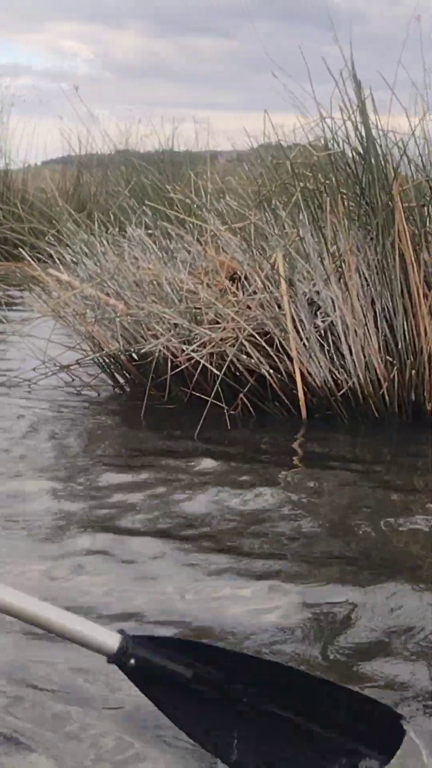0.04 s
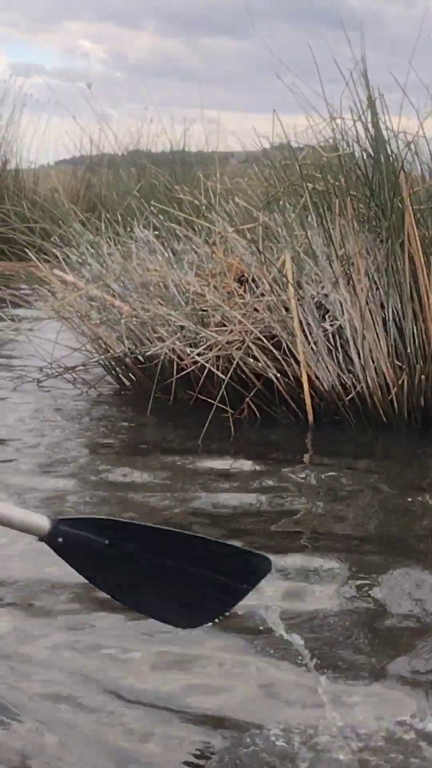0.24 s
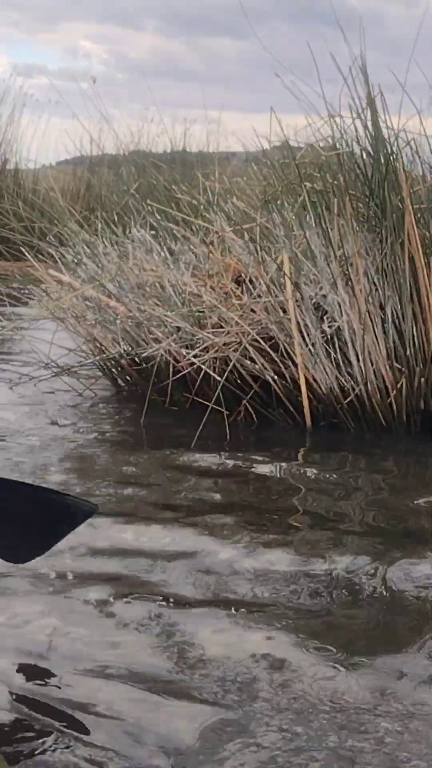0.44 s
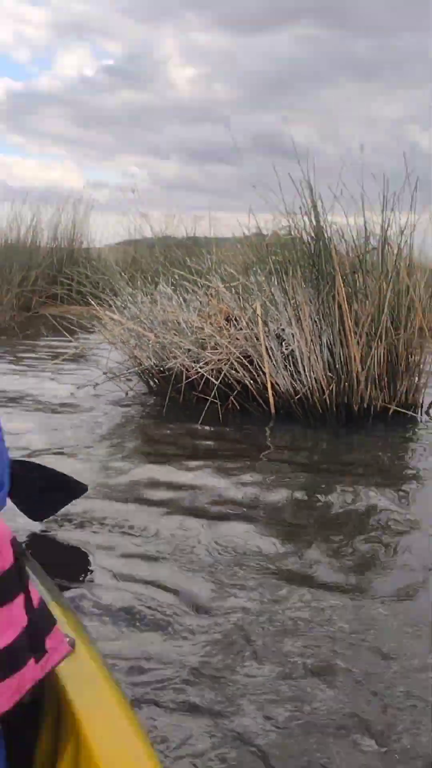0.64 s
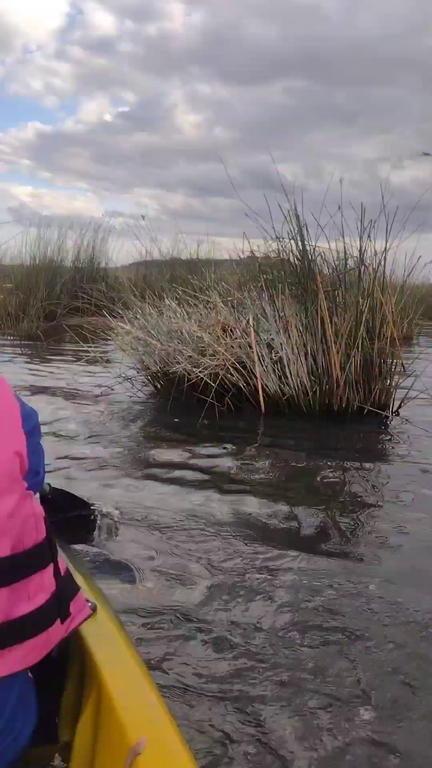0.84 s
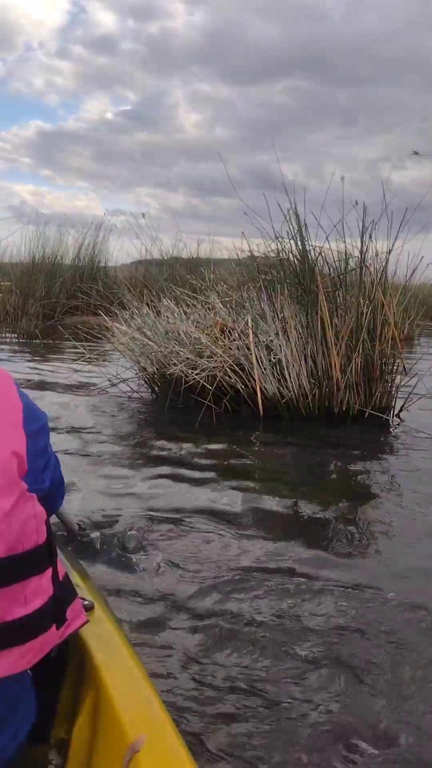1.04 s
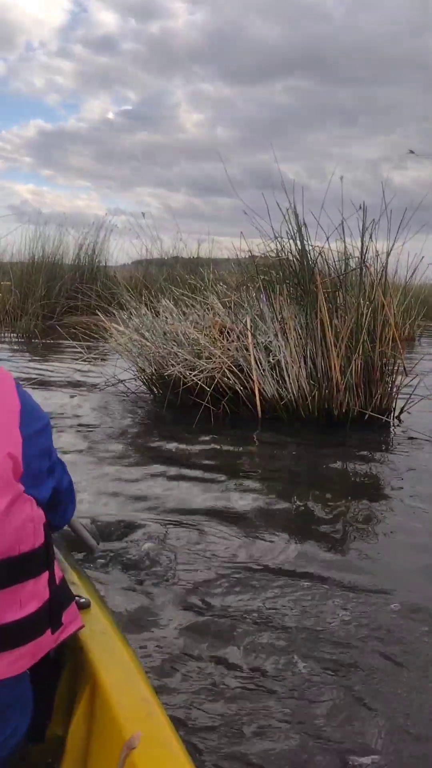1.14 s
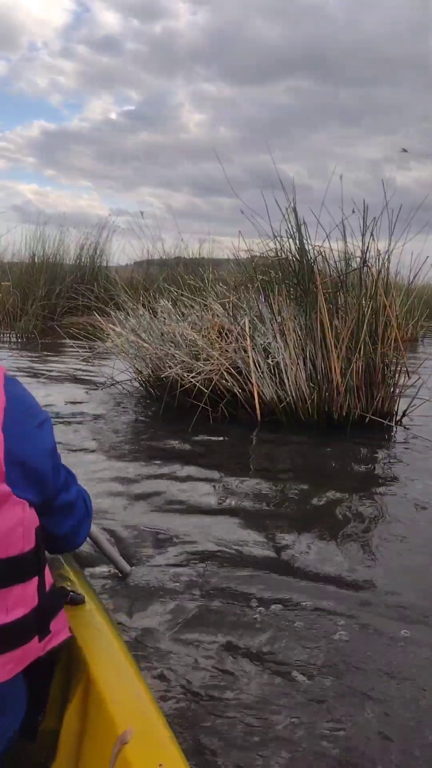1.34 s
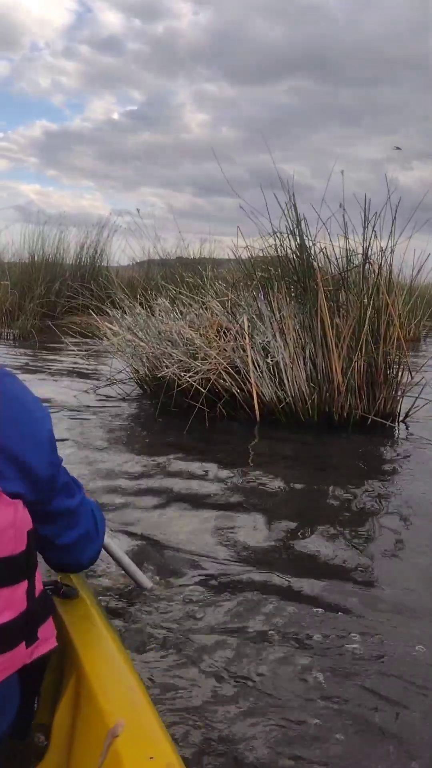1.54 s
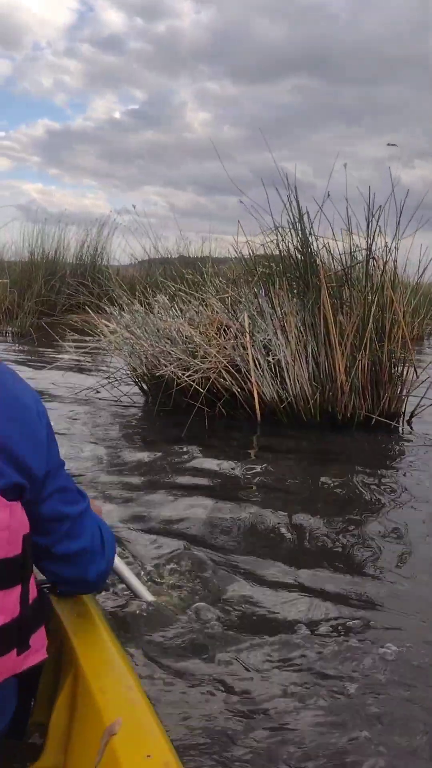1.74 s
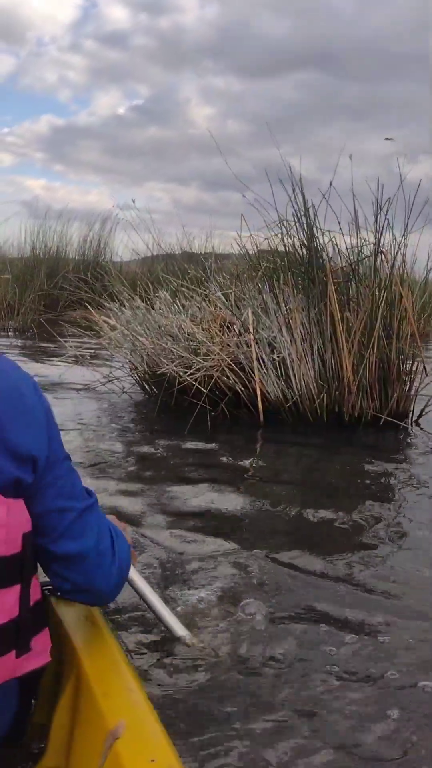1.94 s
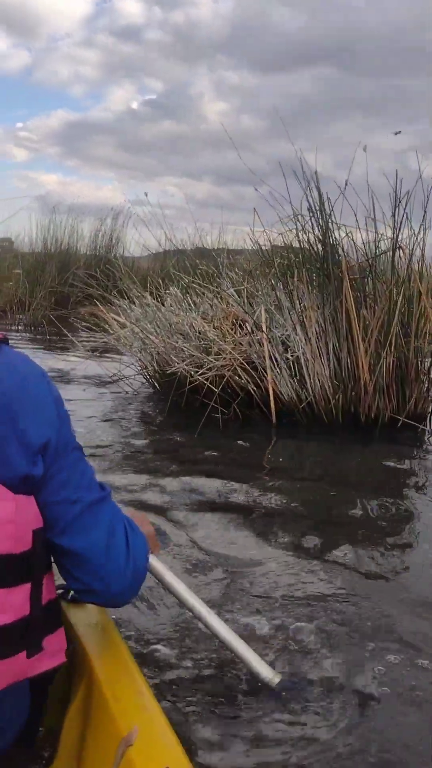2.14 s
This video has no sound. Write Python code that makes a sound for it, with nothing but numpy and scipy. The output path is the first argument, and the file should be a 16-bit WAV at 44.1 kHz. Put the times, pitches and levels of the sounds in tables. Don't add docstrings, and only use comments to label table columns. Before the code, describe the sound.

A paddle stirs shallow water close by, dripping and gurgling; a stuttering finger rub and hard knock hit the microphone early, then wavelets slap the hull, another rub comes midway, and trickling grows outdoors.

```python
import sys
import numpy as np
from scipy import signal
from scipy.fft import rfft, irfft, next_fast_len
from scipy.io import wavfile
from scipy.ndimage import uniform_filter1d, map_coordinates

SR = 44100
rng = np.random.default_rng(int(sys.argv[2]) if len(sys.argv) > 2 else 0)


def natural_amplitude(level_db):
    exponent = np.asarray(level_db, float) / 20
    return 10 ** exponent


def generate_wav(sig):
    pcm = np.round(np.clip(np.atleast_2d(sig).T, -1, 1) * 32767).astype(np.int16)
    wavfile.write(sys.argv[1], SR, pcm)


N = 97020

# start_s, stirring_db, spray_over_stirring_db
STIRRING = [(0, -42.5, -12), (.07, -36, -24.5), (.13, -36.5, -14), (.17, -34, -8), (.25, -40, -10.5),
            (.35, -47, -5.5), (.42, -42.5, -20.5), (.52, -40.5, -13), (.62, -41.5, -14.5), (.75, -46, -18),
            (.9, -47, -14.5), (.96, -37.5, -19), (1.15, -48, -15), (1.27, -43, -20.5), (1.45, -44.5, -18.5),
            (1.67, -42, -14.5), (1.95, -45.5, -15.5), (2.2, -48.5, -15.5)]
# pitch_hz, level_db (per Hz)
SPRAY_COLOUR = [(2000, -17), (3000, 9), (4300, 0), (9000, -0.5), (11500, -7.5), (15500, -12), (15800, -60)]


def unit(x):
    return x / np.sqrt(np.mean(x ** 2) + 1e-20)


def along(points, hz):
    f, value = np.transpose(points)
    return np.interp(np.log(hz + 1), np.log(f + 1), value)


def curves(rows):
    s, *columns = np.transpose(rows)
    return [np.interp(np.arange(N) / SR, s, column) for column in columns]


def wobble(rate):
    knots = rng.standard_normal(int(N * 60 / SR) + 4)
    return map_coordinates(knots, [np.arange(N) * min(rate, 60) / SR])


def filtered(x, response):
    size = next_fast_len(N + SR // 2)
    return irfft(rfft(x, size) * response(np.fft.rfftfreq(size, 1 / SR)), size)[..., :N]


def peak(f, hz, wide):
    return 1j * f * wide / (hz * hz - f * f + 1j * f * wide)


def left_right(db, pan_db):
    return natural_amplitude([[db + pan_db / 2], [db - pan_db / 2]])


def rush(spectrum, alike, patchy_db):
    noise = signal.stft(rng.standard_normal((3, N)), nperseg=256)[2]
    patches = uniform_filter1d(rng.standard_normal(noise.shape[1:]), size=4, axis=0)
    patches = unit(uniform_filter1d(patches, size=5, axis=1))
    noise = signal.istft(noise * natural_amplitude(patchy_db * patches), nperseg=256)[1][:, :N]
    alike = np.clip(alike, 0, 1)
    stereo = np.sqrt(1 - alike) * noise[:2] + np.sqrt(alike) * noise[2]
    return unit(filtered(stereo, lambda hz: natural_amplitude(along(spectrum, hz))))


def grains(s, db, hz, pan_db, cycles, size):
    turns = hz[:, None] * np.arange(size) / SR
    tone = np.sin(2 * np.pi * turns * (1 + .02 * turns / cycles))
    tone = tone * np.exp(-turns / cycles) * (1 - np.exp(-turns / 1.2)) ** 2
    at = (np.round(s * SR).astype(int)[:, None] + np.arange(size)).ravel()
    sides = []
    for side in (1, -1):
        gain = natural_amplitude(db + side * pan_db / 2)[:, None]
        sides.append(np.bincount(at, (gain * tone).ravel(), N + size)[:N])
    return np.array(sides)


def swarm(count, hz, spread, cycles, scatter_db, size):
    r = rng.standard_normal((count, 3))
    s = rng.random(count) * N / SR
    db = scatter_db * np.clip(r[:, 2], -2, 2)
    pitch_hz = np.clip(hz * np.exp(spread * r[:, 0]), 100, SR / 3)
    return unit(grains(s, db, pitch_hz, 5 * r[:, 1], cycles, size))


def slosh():
    # pitch_hz, level_db (per Hz)
    slosh_colour = [(88, 1), (150, -48), (211, -1), (367, -1.5), (1280, -4), (1570, -15), (3550, -26.5),
                    (4270, -32), (6000, -52), (7800, -89), (13200, -120)]
    gurgle = swarm(count=900, hz=907, spread=0.485, cycles=2.4, scatter_db=-1.5, size=800)
    return natural_amplitude(2.5) * rush(slosh_colour, 0.029, patchy_db=4.0) + natural_amplitude(-9) * gurgle


def trickle(spray_db):
    # middle_s, extra_db
    gushes = [
        (1.66, 6.4),
        (1.8, 7.6),
    ]
    gush_s, stroke_s, growth_db_per_s = 0.022, 0.92, 10.5
    t = np.arange(N) / SR
    drips = swarm(count=3600, hz=3320, spread=0.247, cycles=4.2, scatter_db=6.0, size=300)
    drips = filtered(drips, lambda f: (1 + 0.66 * peak(f, 4460, 1100)) / (1 + (f / 5400) ** 10))
    gush_db = sum(db * np.exp(-((t - s) / gush_s) ** 2) for s, db in gushes)
    growth_db = growth_db_per_s * np.clip(t - stroke_s, 0, .7)
    follow_db = 0.4 * (spray_db - spray_db.mean())
    return natural_amplitude(-21 + growth_db + follow_db) * natural_amplitude(gush_db) * drips


def spray():
    fizz = swarm(count=2500, hz=6480, spread=0.41, cycles=2.1, scatter_db=9.5, size=60)
    return natural_amplitude(3.5) * rush(SPRAY_COLOUR, 0, patchy_db=5.5) + natural_amplitude(-6) * fizz


def water():
    stir_db, spray_db = curves(STIRRING)
    lumps_db = 0.1 * wobble(14.46) + 2.0 * wobble(36.14)
    spits_db = wobble(55.75)
    body = natural_amplitude(stir_db + lumps_db) * (slosh() + trickle(spray_db))
    return body + natural_amplitude(stir_db + spray_db + 0.58 * lumps_db + spits_db) * spray()


def wind():
    # pitch_hz, level_db (per Hz)
    rumble_colour = [(4.7, -65), (8.0, 5.5), (96, -6), (147, -12), (211, -12), (350, -21.5), (460, -100),
                     (770, -120)]
    stir_db, _ = curves(STIRRING)
    gusts_db = 1.2 * np.array([wobble(8.26), wobble(7.25)])
    level_db = -34 + 0.66 * (stir_db - stir_db.mean()) + gusts_db
    return natural_amplitude(level_db) * rush(rumble_colour, 0.24, patchy_db=1.0)


def far_hiss():
    return natural_amplitude(-64) * rush(SPRAY_COLOUR, 0, patchy_db=0)


def bubbles_and_drips():
    # start_s, level_db (peak),
    # pitch_hz
    bubble_rows = [(0.036, -24.5, 561), (0.078, -24, 719), (0.132, -18.5, 1293), (0.223, -17, 522),
                   (0.235, -21.5, 517), (0.479, -25, 1270), (0.6, -25.5, 1470), (0.939, -28.5, 860),
                   (1.341, -26, 947), (1.361, -27.5, 872), (1.511, -27.5, 1060), (1.536, -19, 1246),
                   (1.58, -32, 900), (1.628, -29.5, 1350), (1.784, -26.5, 1255), (1.97, -29, 1240),
                   (2.034, -40, 581), (2.057, -30.5, 987)]
    # start_s, level_db (peak), pitch_hz
    drip_rows = [(0.1525, -27.5, 3730), (0.1655, -21.5, 3780), (0.3925, -37.5, 3300), (0.929, -48, 3270),
                 (0.9588, -42, 2730), (1.101, -32, 2490), (1.2282, -38.5, 2600), (1.3583, -35, 2850),
                 (1.3585, -35.5, 3730), (1.155, -42, 1900), (1.4255, -38, 2920), (1.6106, -48, 2860),
                 (1.6644, -36, 2780), (1.8048, -30, 4100), (1.853, -30, 3740), (1.9437, -36.5, 3820)]
    # start_s, level_db (peak), pitch_hz
    spatter_rows = [(0.1035, -41, 4430), (0.114, -38, 3480), (0.1875, -21.5, 5100), (0.2004, -37, 2730),
                    (0.2219, -32, 2530), (0.2337, -39, 2250), (0.2444, -32.5, 2310), (0.3324, -32, 3620),
                    (0.5781, -38, 3190), (0.7362, -38, 2360), (0.804, -43, 4100), (0.8225, -44, 4560),
                    (1.053, -38.5, 2880), (1.153, -43.5, 2820), (1.1987, -47, 2950), (1.2504, -36, 2900),
                    (1.3307, -41, 4370), (1.3967, -42, 2980), (1.447, -36, 2060), (1.478, -47, 2540),
                    (1.496, -35, 2480), (1.5194, -37, 4330), (1.609, -32, 2840), (1.6294, -43, 4300),
                    (1.646, -37, 4640), (1.6568, -30, 2950), (1.6907, -43, 4370), (1.713, -46, 3000),
                    (1.7337, -34, 2970), (1.7868, -33, 2660), (1.7964, -34, 4430), (1.8124, -32, 2140),
                    (1.9789, -41, 4300), (2.0901, -38, 2300), (2.15, -48, 2720)]
    # start_s, level_db, pitch_hz
    flutter_rows = [
        (.362, -14.5, 95),
        (.47, -21.5, 107.5),
        (.466, -26, 296),
        (.468, -14, 980),
        (.469, -26, 1820),
        (.575, -50, 274),
        (.65, -23, 104.6),
        (1.665, -21, 1770),
        (1.79, -39, 2300),
    ]
    rings = 0
    for rows, cycles in ((bubble_rows, 4.5), (drip_rows, 7.5), (spatter_rows, 4.0), (flutter_rows, 1.8)):
        s, db, hz = np.transpose(rows)
        r = rng.standard_normal((len(s), 3))
        rings = rings + grains(s, db, hz, 0.5 * r[:, 0], cycles, size=4000)
        late_s = 0.5544 * cycles / hz * np.abs(r[:, 1])
        detuned_hz = hz * (1 + 0.054 * np.clip(r[:, 2], -1.5, 1.5))
        rings = rings + grains(s + late_s, db + 1.0, detuned_hz, 4 * r[:, 1], cycles, size=4000)
    return rings


def slaps():
    # start_s, level_db (peak), left_over_right_db
    slap_rows = [(0.06, -24, -14), (0.114, -26, -7), (0.434, -24, 16), (0.467, -16.5, 9),
                 (0.516, -29.5, -15), (0.555, -68, -30), (0.573, -30.5, -17), (0.591, -16.5, -4.5),
                 (0.615, -27, -13), (0.656, -36, 5), (0.71, -42, -11), (0.8, -30, -5),
                 (0.828, -24.5, -12.5), (0.901, -30, 2), (1.073, -32.5, -3), (1.25, -21.5, -8.5),
                 (1.436, -37, -4), (1.459, -26, -10.5), (1.591, -24.5, -10), (1.668, -31, 17),
                 (1.688, -26.5, -4), (1.82, -29.5, 5), (1.841, -31, 8), (1.921, -24, 2), (1.947, -23.5, 7),
                 (2.032, -28, -12.5), (2.17, -23, 2.5)]
    # pitch_hz, level_db (per Hz)
    slap_colour = [(120, -20), (300, 0), (1000, -2), (1500, -7), (2200, -26), (4000, -60), (6000, -120)]
    rise_s, fade_60db_s = 0.0024, 0.061
    bursts = np.zeros((2, N + 3000))
    t = np.arange(3000) / SR
    swell = natural_amplitude(-60 * t / fade_60db_s) * (1 - np.exp(-t / rise_s))
    for s, db, pan_db in slap_rows:
        start = round(s * SR)
        bursts[:, start:start + len(t)] += left_right(db, pan_db) * swell
    return natural_amplitude(-5) * bursts[:, :N] * rush(slap_colour, 0.27, patchy_db=4.5)


def bursting_drops():
    # start_s, level_db (peak), left_over_right_db
    crack_rows = [(0.1448, -16, -18), (0.1526, -31, -9), (0.1649, -10, -2), (0.1918, -19, -8),
                  (0.2608, -25, 1), (0.277, -44, 9), (0.3446, -47, -5), (0.4694, -6, 3.5), (0.656, -20, 3),
                  (0.972, -21, -7), (1.3645, -21.5, -2), (1.671, -14.5, -4), (1.7524, -16.5, 3),
                  (1.8052, -15.5, 4), (2.1834, -16.5, -5)]
    # pitch_hz, level_db
    crack_colour = [(400, -3), (1300, -3), (2500, -7), (5000, -4), (9000, 0), (11500, -7), (13500, -18),
                    (16500, -21)]
    rise_s, fade_60db_s = 0.00078, 0.005
    cracks = np.zeros((2, N + 400))
    t = np.arange(400) / SR
    shape = natural_amplitude(-60 * t / fade_60db_s) * (1 - np.exp(-t / rise_s)) ** 2
    for s, db, pan_db in crack_rows:
        start = round(s * SR)
        noise = rng.standard_normal((2, len(t)))
        cracks[:, start:start + len(t)] += left_right(db, pan_db) * shape * noise
    return natural_amplitude(2.5) * filtered(cracks[:, :N], lambda hz: natural_amplitude(along(crack_colour, hz)))


def finger():
    # start_s, level_db (peak)
    slip_rows = [(.1745, -13), (.1875, -15), (.191, -14), (.1973, -10), (.2025, -15), (.2078, -12),
                 (.2138, -6), (.2185, -13), (.223, -7), (.226, -7), (.2312, -9), (.237, -10), (.2455, -13),
                 (.2612, -13), (.345, -25), (.357, -25), (.368, -25), (.9885, -8), (.9933, -10),
                 (.9972, -7), (.9999, -9), (1.0035, -9), (1.0066, -8), (1.0095, -6), (1.0157, -6)]
    # pitch_hz, width_hz, level_db
    cavity = [
        (504, 76, 4.5),
        (247, 170, -17),
        (870, 250, -3),
        (1323, 220, 2.5),
        (1460, 83, -1.5),
        (1742, 20, -1.5),
    ]
    stutter_s, slip_db, hiss_db, leak_db = 0.001158, 25.5, -25, -61
    pulses = np.zeros(N)
    for (s, db), r in zip(slip_rows, rng.standard_normal((len(slip_rows), 2))):
        pulses[round(s * SR)] += natural_amplitude(db)
        again_s = s + stutter_s * (1 + .3 * abs(r[0]))
        pulses[round(again_s * SR)] += r[1] * natural_amplitude(db) / 2
    contact = uniform_filter1d(uniform_filter1d(np.abs(pulses), size=400), size=400)
    grit, rub = np.sqrt(np.abs(contact) / 20) * rng.standard_normal((2, N))

    def cavity_response(f):
        modes = sum(natural_amplitude(db) * peak(f, hz, wide) for hz, wide, db in cavity)
        return modes * (0.12 / (1 + (f / 4000) ** 2) + 1 / (1 + (f / 1930) ** 20))

    ring = filtered(natural_amplitude(slip_db) * (pulses + grit), cavity_response)
    hiss = filtered(natural_amplitude(slip_db + hiss_db) * (rub * 3 + pulses),
                    lambda f: peak(f, 7340, 770) * peak(f, 7340, 2 * 770))
    return (ring + hiss) * natural_amplitude([[0], [leak_db]])


def bump():
    # start_s, left_step, right_step, dies_in_s
    bump_rows = [
        (.261, .38, 0, .02),
        (.2611, .4, 0, .0006),
        (.2617, 0, -.55, .001),
        (.2627, 0, 1.05, .002),
        (.2731, 0, -.5, .002),
        (.2752, -.12, .2, .004),
    ]
    # start_s, offset (1 is full scale)
    offset_rows = [(0, .05), (.03, -.02), (.26, -.02), (.274, -.06), (.281, -.26), (.3, -.1), (.328, 0),
                   (.35, .3), (.45, .25), (.59, -.03), (.7, -.04), (1.1, -.01), (2.2, 0)]
    t = np.arange(N) / SR
    offset, = curves(offset_rows)
    steps = uniform_filter1d(np.array([offset, offset]), size=150)
    for s, left, right, dies_s in bump_rows:
        steps += np.outer([left, right], (t >= s) * np.exp(-np.clip(t - s, 0, 1) / dies_s))
    return filtered(steps, lambda f: 1 / (1 + 1j * f / 960) ** 2)


def duck():
    # start_s, drop_db, hold_s, return_s
    duck_rows = [
        (0.277, 11, 0.028, 0.035),
        (1.046, 4.5, 0.014, 0.021),
    ]
    t = np.arange(N) / SR
    drop_db = 0
    for s, db, hold_s, back_s in duck_rows:
        drop_db = drop_db + db * (t > s) * np.clip(1 - (t - s - hold_s) / back_s, 0, 1)
    return natural_amplitude(-drop_db)


def through_ports(air):
    # pitch_hz, left_over_right_db
    port_colour = [(60, 0.5), (110, -6), (200, -13), (380, -10), (700, -10.5), (1290, 5), (2380, 1.5),
                   (4400, -15), (8120, 7.5), (15000, -1.5)]

    def response(hz):
        sides = natural_amplitude(np.outer([.5, -.5], along(port_colour, hz)))
        return sides * (1 - 0.6 * peak(hz, 3550, 450)) * (hz < 15750)

    return filtered(air, response)


def scene():
    air = (water() + wind()) * duck() + bubbles_and_drips()
    return through_ports(air) + far_hiss() + slaps() + bursting_drops() + finger() + bump()


def band_limit(x):
    return signal.sosfilt(signal.butter(12, 16580, fs=SR, output="sos"), x)


def record(dry):
    mix = filtered(dry, lambda hz: hz < 16450)
    return band_limit(mix)


dry = scene()
out = record(dry)
generate_wav(out)
```